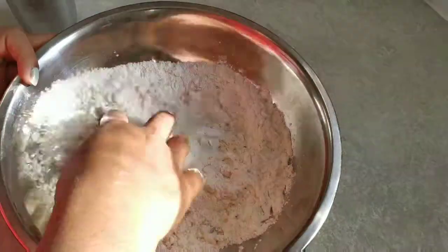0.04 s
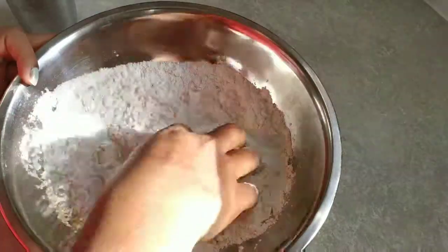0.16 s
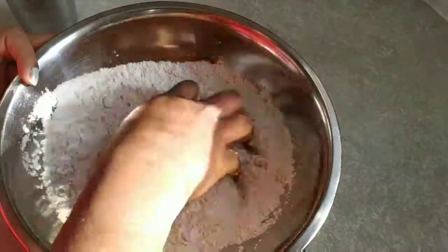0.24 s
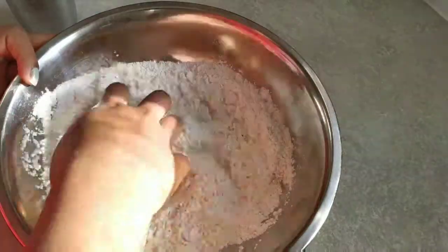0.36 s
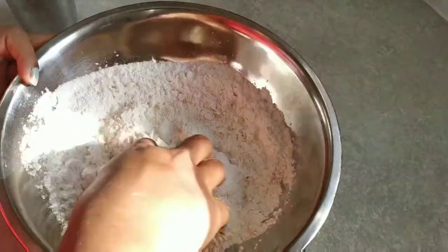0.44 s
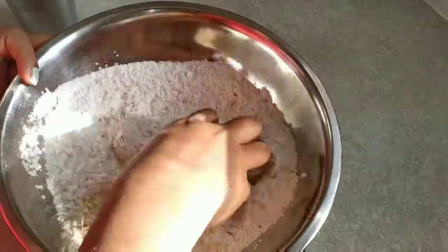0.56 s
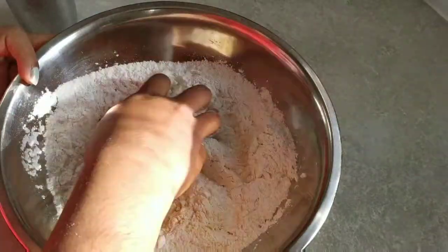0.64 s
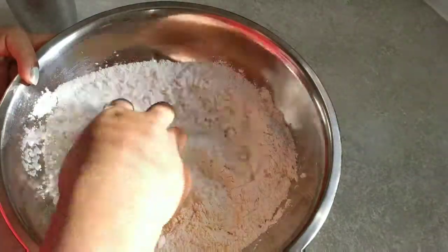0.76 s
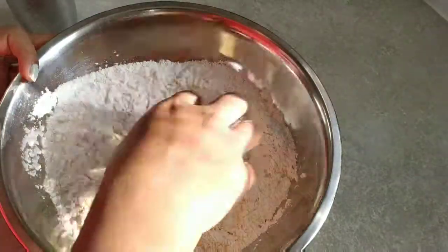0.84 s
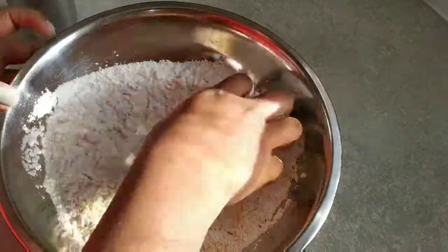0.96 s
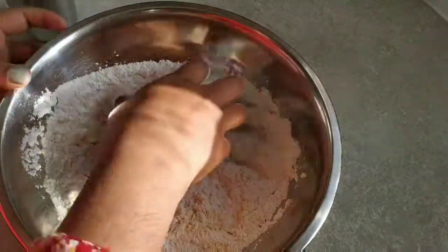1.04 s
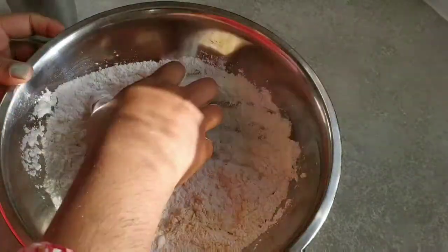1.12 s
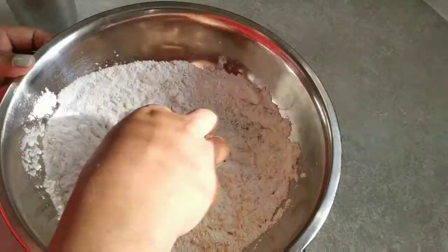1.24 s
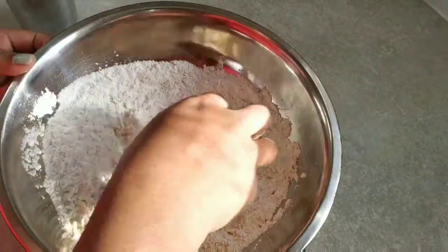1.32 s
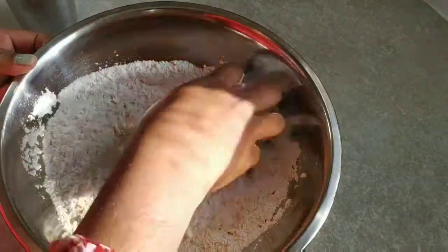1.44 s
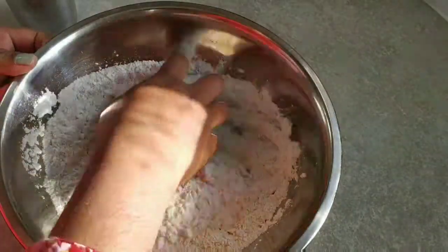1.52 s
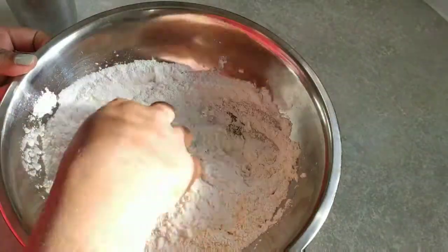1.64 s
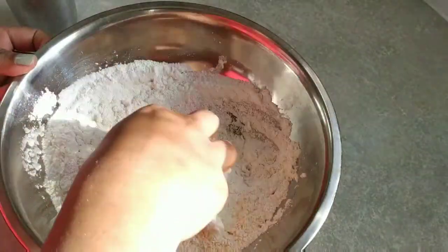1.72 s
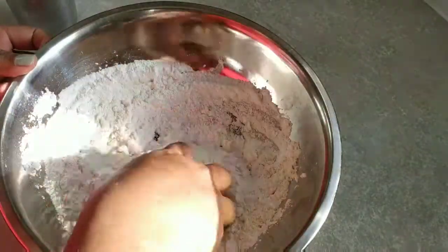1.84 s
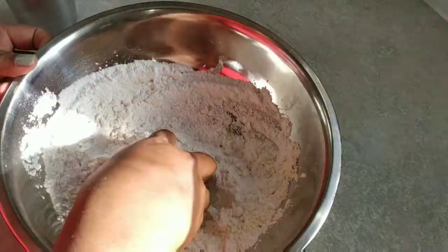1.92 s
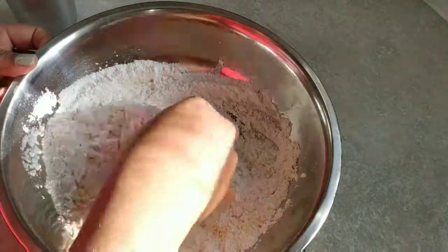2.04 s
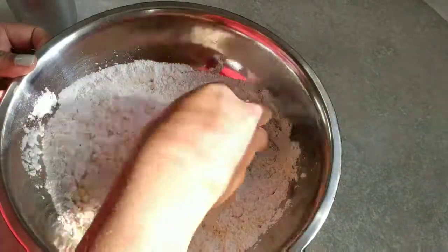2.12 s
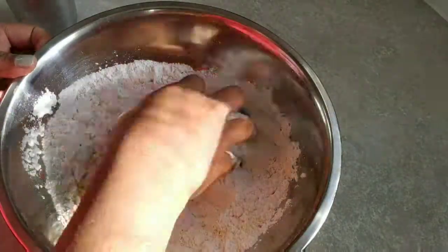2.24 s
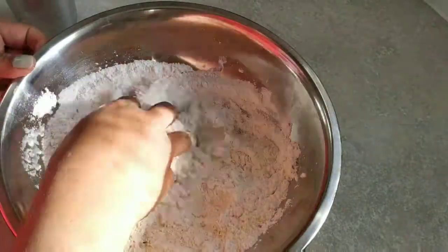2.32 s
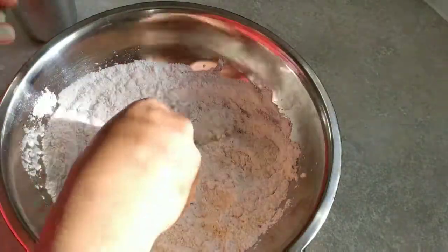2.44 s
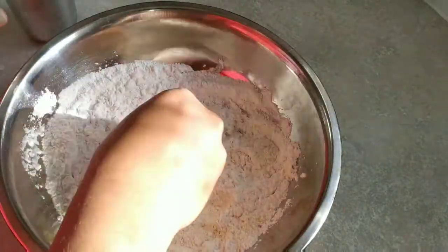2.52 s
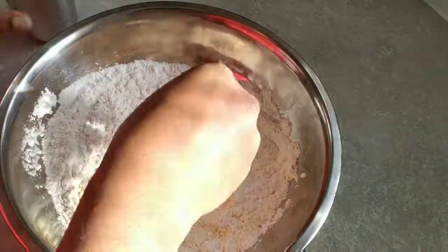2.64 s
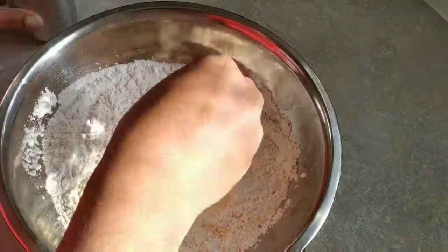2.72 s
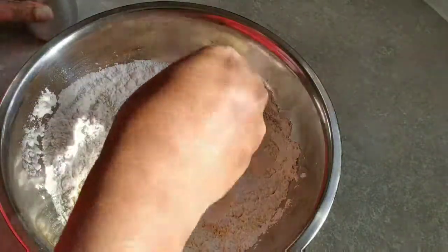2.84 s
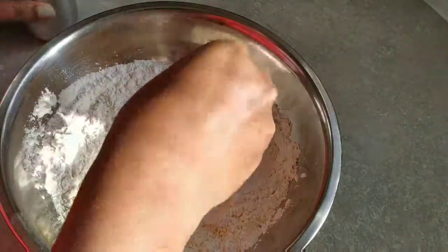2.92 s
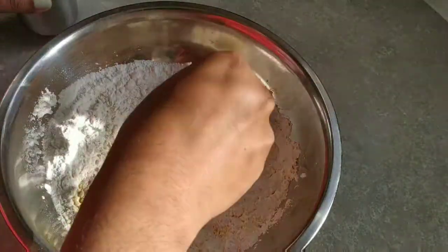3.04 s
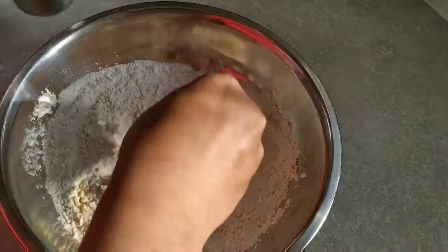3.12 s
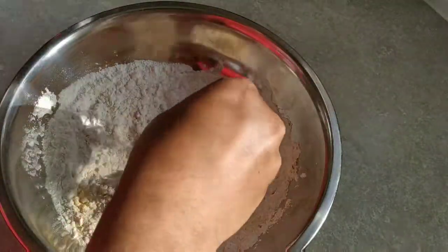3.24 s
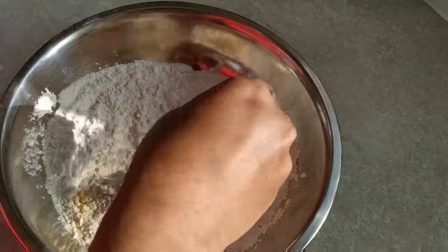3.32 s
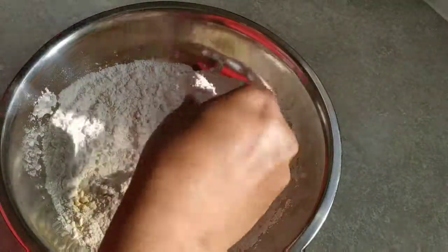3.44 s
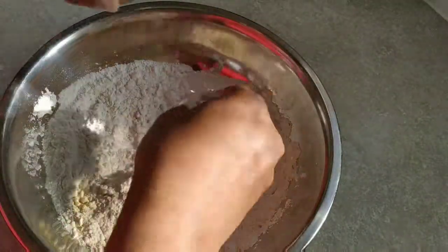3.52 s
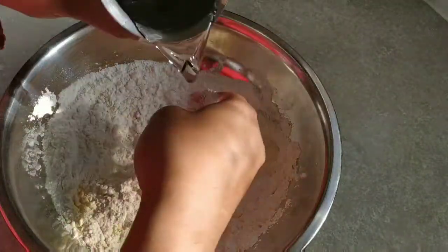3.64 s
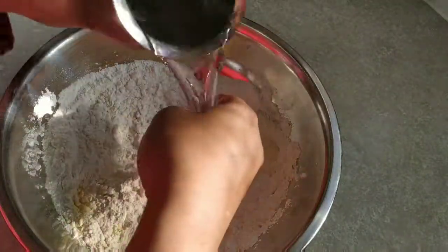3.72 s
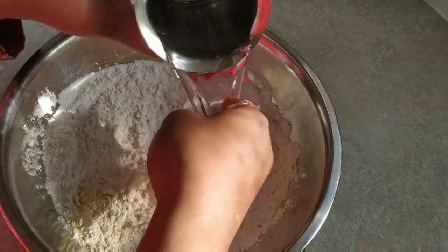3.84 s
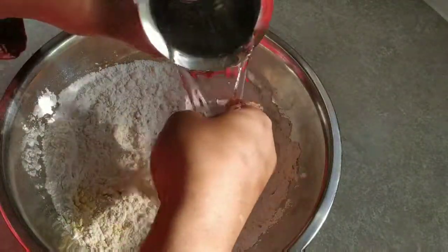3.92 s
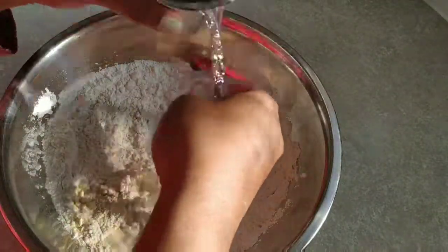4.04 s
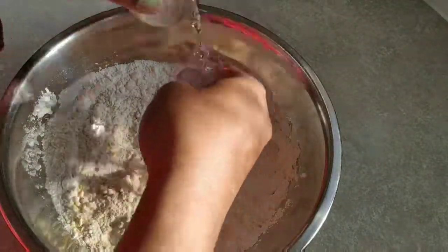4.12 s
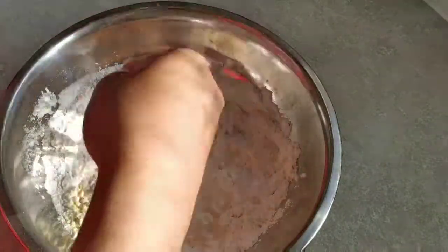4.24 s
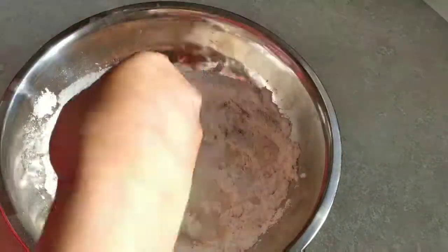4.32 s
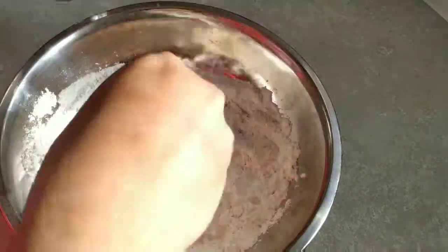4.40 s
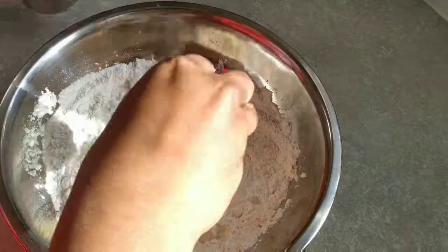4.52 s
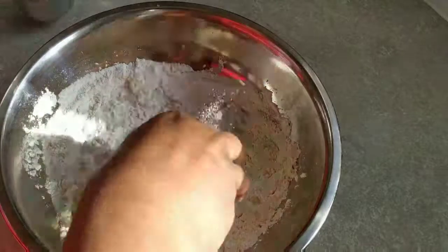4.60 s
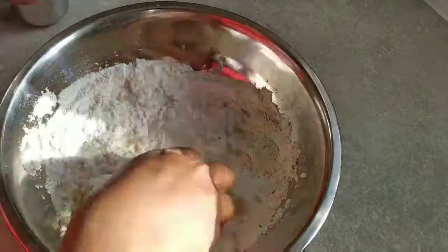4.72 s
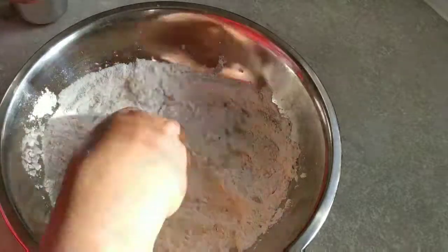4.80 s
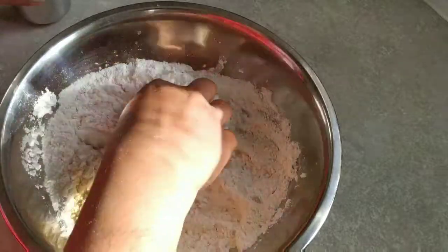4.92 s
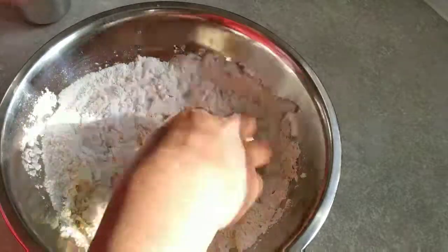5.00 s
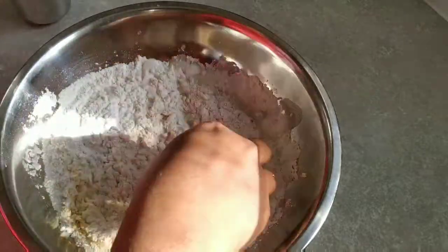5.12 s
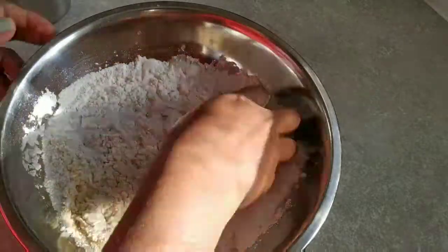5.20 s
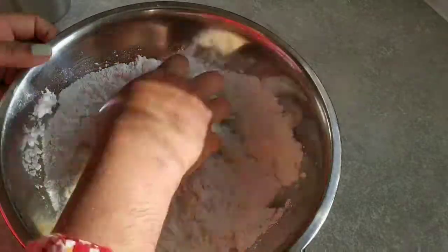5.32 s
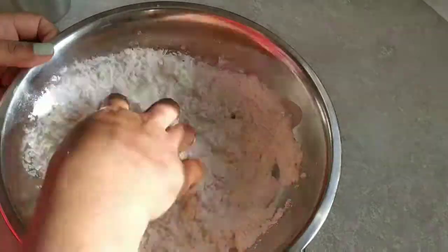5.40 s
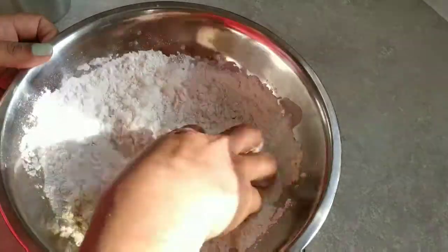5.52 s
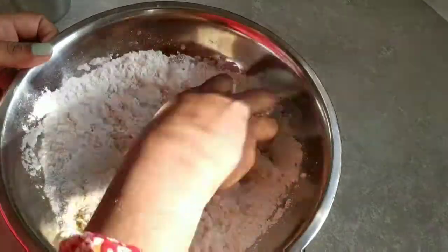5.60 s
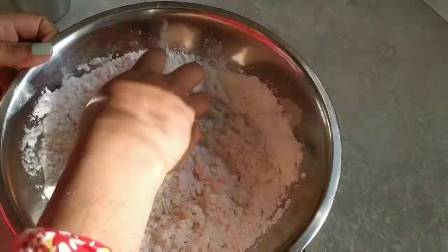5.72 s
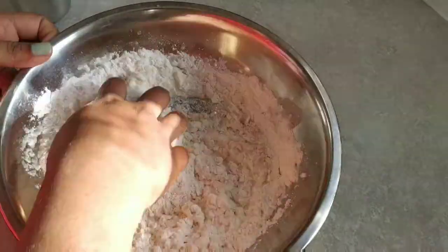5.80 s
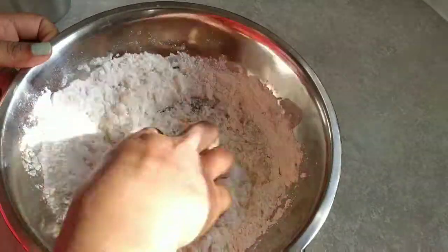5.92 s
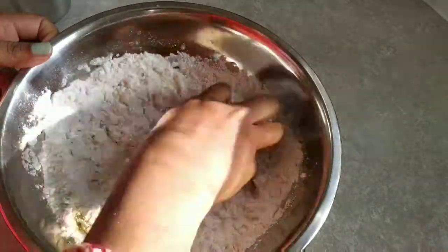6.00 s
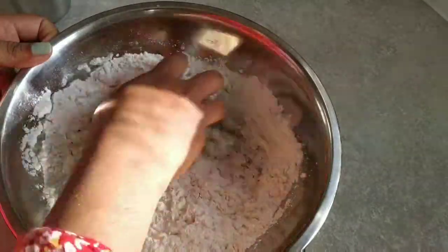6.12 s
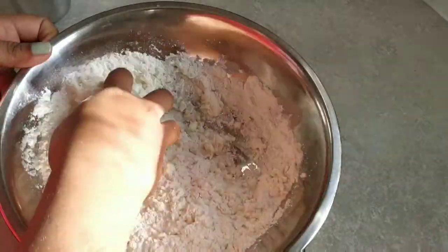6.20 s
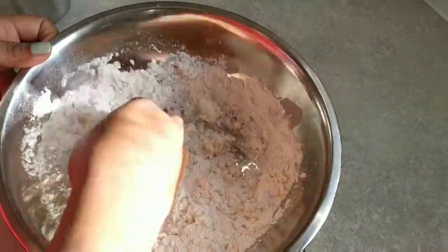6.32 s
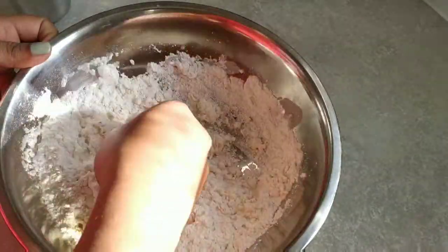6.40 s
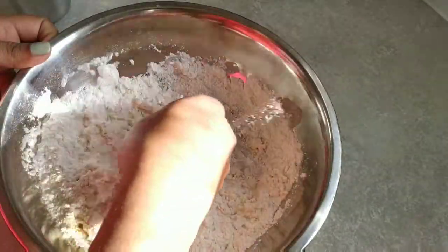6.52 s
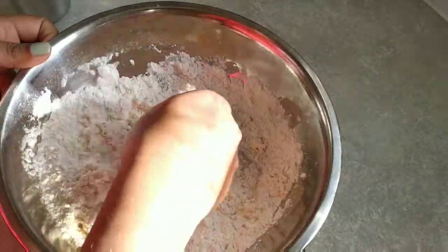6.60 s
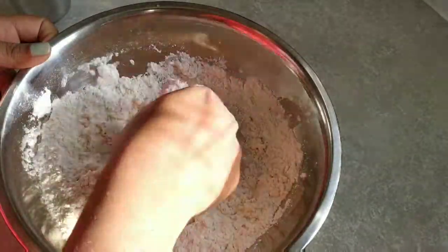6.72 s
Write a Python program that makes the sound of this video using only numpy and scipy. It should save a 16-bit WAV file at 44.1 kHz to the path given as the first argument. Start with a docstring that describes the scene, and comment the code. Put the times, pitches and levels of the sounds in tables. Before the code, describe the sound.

Powdery scrunching strokes in a metal bowl, faint bumps and nail ticks, a short trickle of water, one loud tumbler clank, then more rustling.

```python
"""On a kitchen counter a hand sweeps dry flour round a steel bowl: hissing, crunching clouds of tiny clicks.
Palm and fingernails bump the bowl, and fingertips squeak on it: soft pushes, ringing tones, narrow noise.
A steel tumbler is picked up, pours a little water (droplet pings, rising bubbles) and is set down with
a ringing knock. Fading noise tails make the small room answer. One gliding tone is a far-off bird's
whistle; shaped noise makes the quiet air and a deep rumble."""
import sys
import numpy as np
from scipy import signal
from scipy.fft import rfft, irfft, next_fast_len
from scipy.io import wavfile
from scipy.ndimage import uniform_filter1d, map_coordinates

SR = 44100
rng = np.random.default_rng(int(sys.argv[2]) if len(sys.argv) > 2 else 0)


def pcm_store(signal):
    """Save signal as 16-bit PCM."""
    levels = np.round(np.clip(np.atleast_2d(signal), -1, 1) * 32767)
    wavfile.write(sys.argv[1], SR, levels.astype(np.int16).T)


N = 298116  # length in samples

# Finger strokes through the flour: full push t/s, rise/(dB per s), hold/s, rustle level/dB,
# coarse crunch against the rustle, level/dB
STROKES = [(0.01, 150, 0.074, -65.5, -6.5), (0.317, 128, 0.068, -58, -9), (.56, 150, .07, -69, -8),
           (0.661, 500, 0.045, -58, -5), (0.723, 200, 0.013, -55, -12), (0.887, 300, 0.028, -67.5, -2),
           (0.984, 170, 0.11, -56, -17), (1.104, 170, 0.055, -51, -10.5), (1.55, 186, .035, -50, -10.5),
           (1.591, 300, 0.0097, -50, -5.5), (1.91, 150, 0.06, -64.5, -7), (2.2, 400, .01, -66, -5.5),
           (2.266, 180, .12, -62.5, -7), (2.331, 300, .012, -58.5, -3), (2.427, 300, 0.014, -69.5, -3),
           (2.665, 200, 0.02, -68.5, -7), (2.797, 299, .01, -73, -11), (2.935, 150, 0.081, -70, -10),
           (3.148, 200, 0.019, -73, -20), (3.3, 150, 0.1, -72, -13), (4.664, 400, 0.01, -63, -4.5),
           (5.01, 147, 0.11, -71.5, -3.5), (5.307, 156, .11, -55, -10.5), (5.71, 140, 0.07, -51, -9),
           (6.118, 119, .11, -52, -6.5), (6.54, 300, .2, -70.5, -11)]
# Tone colour of the powder: f/Hz, level/dB
POWDER_COLOUR = [(250, -44), (600, -10), (1300, -9), (2000, -9.5), (2800, -5), (4000, -5), (5200, -6),
                 (6300, 0.5), (7600, -1.5), (9500, -4), (12500, -12.5), (15800, -14)]
# How alike the flour clicks are on left and right: f/Hz, likeness/(-1 to 1)
POWDER_ALIKE = [(1000, 0.39), (4000, 0.025)]
# Gushes of water landing in the flour: t/s, hold/s, splash level/dB
GUSHES = [(3.845, 0.011, -62), (3.882, 0.015, -58), (4.033, 0.054, -59), (4.124, 0.095, -56.5),
          (4.237, .01, -61.5), (4.292, .012, -59), (4.46, .1, -69)]
# Tone colour of the splashing: f/Hz, level/dB
SPLASH_COLOUR = [(530, 3.5), (900, -3), (1540, -13.5), (1850, -10), (2380, -10), (3020, -10.5),
                 (3450, -8.5), (9780, -7), (15800, -15)]
# Single bubbles: t/s, level/dB, starting pitch f/Hz, rise/(share of that pitch per s)
BUBBLES = [(3.878, -43, 6680, 2), (3.888, -48, 1350, 10), (3.903, -48.5, 1850, 17), (3.96, -43.5, 1850, 5),
           (3.979, -43.5, 2940, 6.3), (4.137, -41.5, 3090, 5), (4.217, -47.5, 2640, 22),
           (4.486, -47, 3790, 11), (4.552, -47.5, 2680, 35)]
# Tumbler touching the counter: t/s, level/dB, top of the soft contact f/Hz, ring and crack level/dB
KNOCKS = [(2.828, -41, 720, -40), (2.913, -29, 543, -43), (2.969, -38, 634, -43), (4.712, -10.5, 2500, -25),
          (4.741, -20.5, 1400, -23.5), (4.749, -25.5, 925, -21.5), (4.928, -21.5, 650, -36),
          (4.961, -37.5, 700, -45)]
# Tone colour of the tumbler's push on the counter: f/Hz, level/dB
THUD_COLOUR = [(30, -67), (60, -13.5), (115, -16), (185, -1.5), (290, 2), (410, -4.5), (520, 6),
               (630, -10.5), (770, 0), (1080, -7), (1450, -17.5), (2100, -14), (3000, -21.5), (4800, -30),
               (8300, -33), (15000, -46)]
# Ringing tones of the counter and what stands on it: f/Hz, level/dB, time to fade by 60 dB t60/s
COUNTER_TONES = [(188.6, 9, 0.19), (235, 0.5, 0.16), (278.8, 2.5, 0.39), (305.4, 6.5, 0.32),
                 (339.5, -1, 0.43), (384.3, 7.5, 0.2), (487.4, 0, 0.3), (527, 0.5, 0.31), (541.7, 9, 0.25),
                 (622, -5, 0.44), (680, -4, 0.47), (735, -1.5, 0.42), (773, -5, 0.22), (760, -11, .28),
                 (977, 7, 0.13), (1023, -12, 0.15), (1026, -1.5, 0.2)]
# Ringing tones of the steel tumbler: f/Hz, level/dB, t60/s
TUMBLER_TONES = [(2760, -8, 0.11), (3408, -15, 0.24), (4177, -5.5, 0.4), (4280, -11, 0.18),
                 (6030, -17, 0.33), (8100, -10, 0.3), (8360, -10, .16), (10000, -21, 0.17),
                 (11200, -18, 0.37), (12640, -20, .18)]
# Palm pressing the bowl down: t/s, level/dB
BUMPS = [(0.3, -52.5), (0.68, -54.5), (0.916, -53.5), (0.977, -45.5), (1.119, -51), (1.263, -55),
         (1.426, -39), (1.588, -54.5), (1.918, -55.5), (4.2, -52.5), (5.305, -44), (5.429, -58),
         (5.588, -45), (6.201, -53)]
# Tone colour of the soft palm's push: f/Hz, level/dB
PALM_COLOUR = [(40, -36), (110, -5.5), (180, 6.0), (330, -10.0), (600, -27), (1500, -44), (8000, -75)]
# Ringing tones of the bowl on the counter: f/Hz, level/dB, t60/s
BASE_TONES = [(135.4, 4, 0.26), (161, 3, 0.15), (186, -2.5, 0.49), (233, 3, 0.055), (348, -7.5, 0.041)]
# Fingernails on the steel: t/s, tick level/dB, ring level/dB
TAPS = [(0.975, -48, -67), (1.005, -38, -55), (1.428, -51.5, -79), (5.3048, -29.5, -46),
        (5.308, -31.5, -67)]
# Tone colour of a nail tick: f/Hz, level/dB
NAIL_COLOUR = [(180, -13), (300, -7.5), (600, -3.5), (1000, -2.5), (1700, -7), (2300, -8.5), (3300, -12),
               (5000, -13), (6100, 2), (8000, -9), (10800, -13.5), (15800, -30)]
# Ringing tones of the bowl's bare wall: f/Hz, level/dB, t60/s
BOWL_TONES = [(574, -12.5, 0.34), (753, -5, 0.16), (1405, -10, 0.33), (1847, -10.5, 0.32),
              (2267, -2.5, 0.35), (2600, -8, 0.44), (2940, -13, 0.29), (6150, -5, 0.37), (8200, -12, .2)]
# Fingertips skidding on bare steel: t/s, level/dB, pitch f/Hz, t60/s
SKIDS = [(1.067, -37.5, 1370, 0.26), (1.801, -37, 10150, 0.022), (2.899, -45, 7550, .06)]
# Tone colour of the quiet air: f/Hz, level/dB
AIR_COLOUR = [(20, -20.5), (56, -14.5), (95, -23.5), (170, -14.5), (260, -24.5), (420, -21), (560, -21),
              (650, -23), (1080, -26), (1400, -30.5), (2500, -35.5), (5800, -36.5), (13000, -38),
              (15800, -43.5)]
# How alike the air is on left and right: f/Hz, likeness/(-1 to 1)
AIR_ALIKE = [(60, 0.2), (150, 0.8), (380, 0.66), (950, 0.054), (2380, -0.075), (5980, -0.047),
             (15000, -0.02)]
# Tone colour of the deep rumble: f/Hz, level/dB
RUMBLE_COLOUR = [(5, -6.0), (12, 6.0), (28, -6.5), (52, -5.5), (90, -17), (200, -41), (600, -82)]
# How alike the rumble is on left and right: f/Hz, likeness/(-1 to 1)
RUMBLE_ALIKE = [(50, 0.91)]
# How long the room's tail lasts: f/Hz, t60/s
ROOM_FADE = [(150, 0.29), (500, 0.38), (1500, 0.51), (5000, 0.43), (14000, 0.21)]
# How alike that tail is on left and right: f/Hz, likeness/(-1 to 1)
ROOM_ALIKE = [(130, 1), (300, 0.93), (640, 0.12), (1100, -0.19), (2000, 0.066)]

FALL_DB_PER_S = 210  # the hand slows at the end of a stroke
TRICKLE_DB, TRICKLE_DB_PER_S = -12, 67  # loose powder slides back after each stroke
GUSH_RISE_DB_PER_S, GUSH_FALL_DB_PER_S = 500, 258  # a gush lands abruptly and soaks in
SPLASH_WET_DB = -4  # room tail on the water
BUBBLE_T60_S, BUBBLE_WAVER = .038, .05  # life; unsteadiness as a share of the pitch
BIRD_S, BIRD_LENGTH_S, BIRD_DB = 1.305, 0.2, -68  # one far whistle
BIRD_HZ, BIRD_ARCH_HZ, BIRD_SKEW = 4740, 352, .6  # pitch at its ends, lift at the top, early peak below 1
RUMBLE_DB, RUMBLE_SWELL_DB = -62, 6.5  # steady level; lift while the flour is first swept
SWELL_S, SWELL_WIDTH_S = 1.7, 1.3  # middle and width of that lift
TOP_HZ = 15800  # the recorder's band limit


def flour():
    """Powder shears under the fingers as a dense hiss of grains, with coarser crunch set for each stroke."""
    fine_gain, coarse_gain = np.zeros((2, N))
    for s, rise, hold, db, grit_db in STROKES:
        push = swell(s, hold, rise, FALL_DB_PER_S)
        trickle = amp(TRICKLE_DB) * swell(s, hold, rise, TRICKLE_DB_PER_S)
        stroke = amp(db) * np.maximum(push, trickle)
        fine_gain = np.maximum(fine_gain, stroke)
        coarse_gain = np.maximum(coarse_gain, stroke * amp(grit_db))
    clicks = spread(grains(rate=8000, size_db=3), POWDER_ALIKE)
    # split the clicks near 4300 Hz: crunch below, hiss above
    low_share = lambda hz: 1 / (1 + (hz / 4300) ** 6)
    hiss = unit(filtered(clicks, lambda hz: amp(along(POWDER_COLOUR, hz)) * (1 - low_share(hz))))
    crunch = unit(filtered(clicks, lambda hz: amp(along(POWDER_COLOUR, hz)) * low_share(hz)))
    rustle = amp(0.72) * (fine_gain * hiss + coarse_gain * crunch)
    flutter = amp(0.85 * wobble(70))
    return room(patchy(rustle, depth_db=3.0) * flutter, wet_db=-6)


def water():
    """A thin stream spatters on hand and flour in gushes; trapped bubbles ring and rise in pitch."""
    start, end = GUSHES[0][0] - .06, GUSHES[-1][0] + .17
    spatter = fizz(start, end, count=7000, cycles=4.5, size_db=-2.5)
    gushes = [amp(db) * swell(s, hold, GUSH_RISE_DB_PER_S, GUSH_FALL_DB_PER_S) for s, hold, db in GUSHES]
    flow = np.max(gushes, axis=0)
    out = spatter * flow * amp(0.5 + 3.3 * wobble(60))
    t = np.arange(SR // 2) / SR
    for s, db, hz, rise in BUBBLES:
        waver = BUBBLE_WAVER * wobble(530)[:len(t)]
        pitch = hz * (1 + rise * np.minimum(t, BUBBLE_T60_S) + waver)
        tone = np.sin(2 * np.pi * np.cumsum(pitch) / SR)
        onset = 1 - np.exp(-t / 0.00066)
        add(out, s, amp(db - 3.5) * fade(BUBBLE_T60_S) * onset * tone)
    return room(out, wet_db=SPLASH_WET_DB)


def tumbler():
    """Each contact thumps the counter and rings the tumbler; soft contacts lose their treble."""
    out, push = np.zeros((2, N)), pulse(THUD_COLOUR)
    slab, steel = ring(COUNTER_TONES), np.array([ring(TUMBLER_TONES), ring(TUMBLER_TONES)])
    for s, db, bright_hz, steel_db in KNOCKS:
        # bending waves bounce round the slab and smear the push over a few milliseconds
        echoes = spread(rng.standard_normal((2, SR // 2)), ROOM_ALIKE) * fade(0.044) * amp(-18.5)
        smeared = signal.fftconvolve(push[None], echoes, axes=1)[:, :SR // 2]
        thud = push * amp(-5.0) + smeared
        body = room(thud, wet_db=-3.0) + amp(-25.0) * slab
        soft = signal.lfilter(*signal.butter(2, min(bright_hz, SR / 4), fs=SR), body)
        crack = signal.lfilter(*signal.butter(2, 2500, "high", fs=SR), body)
        bright = amp(-7.0) * steel + amp(24) * crack
        add(out, s, amp(db) * (soft + amp(steel_db) * bright))
    return out


def bowl():
    """The palm rocks the damped bowl on its base; nails tick on the bare wall and make it sing."""
    out = np.zeros((2, N))
    push = pulse(PALM_COLOUR)
    for s, db in BUMPS:
        bump = amp(-1.0) * push + amp(-12.5) * ring(BASE_TONES)
        add(out, s, room(amp(db) * bump, wet_db=-2.0))
    for s, tick_db, ring_db in TAPS:
        noise = rng.standard_normal((2, SR // 2))
        scrape = unit(filtered(noise, lambda hz: amp(along(NAIL_COLOUR, hz))))
        tick = room(amp(tick_db - 3.5) * scrape * fade(0.049), wet_db=-4.5)
        song = np.array([ring(BOWL_TONES), ring(BOWL_TONES)])
        add(out, s, tick + amp(ring_db) * song)
    return out


def skids():
    """Skin catches on the steel in a brief, narrow squeak."""
    out = np.zeros((2, N))
    for s, db, pitch_hz, t60 in SKIDS:
        noise = rng.standard_normal((2, SR // 2))
        squeak = unit(filtered(noise, lambda hz: 1 / (1 + ((hz - pitch_hz) / 150) ** 2)))
        onset = 1 - fade(.01)
        add(out, s, amp(db - 14.5) * squeak * fade(t60) * onset)
    return out


def bird():
    """One thin whistle from outside; pitch and loudness rise quickly and sag along the same arch."""
    progress = np.clip((np.arange(N) / SR - BIRD_S) / BIRD_LENGTH_S, 0, 1)
    arch = np.sin(np.pi * progress ** BIRD_SKEW)
    pitch = BIRD_HZ + BIRD_ARCH_HZ * arch
    whistle = np.sin(2 * np.pi * np.cumsum(pitch) / SR)
    return room(amp(BIRD_DB) * arch * whistle, wet_db=-8)


def background():
    """Nearly steady room noise over a deep rumble that swells once."""
    air = spread(rng.standard_normal((2, N)), AIR_ALIKE)
    air = unit(filtered(air, lambda hz: amp(along(AIR_COLOUR, hz))))
    rumble = spread(rng.standard_normal((2, N)), RUMBLE_ALIKE)
    rumble = unit(filtered(rumble, lambda hz: amp(along(RUMBLE_COLOUR, hz))))
    lift = np.exp(-((np.arange(N) / SR - SWELL_S) / SWELL_WIDTH_S) ** 2)
    return amp(-63.0 + 0.32 * wobble(5.16)) * air + amp(RUMBLE_DB + RUMBLE_SWELL_DB * lift) * rumble


def room(x, wet_db):
    """The sound plus a fresh diffuse tail from the kitchen walls, fading at its own pace at each pitch."""
    _, t, z = signal.stft(rng.standard_normal((2, SR // 2)), SR, nperseg=256)
    hz = np.fft.rfftfreq(256, 1 / SR)
    build_up = 1 - np.exp(-t / 0.0012)
    decay = amp(-60 * t / along(ROOM_FADE, hz)[:, None])
    tail = signal.istft(z * build_up * decay, SR, nperseg=256)[1]
    tail = spread(tail / np.linalg.norm(tail[0]), ROOM_ALIKE)
    return x + amp(wet_db) * signal.fftconvolve(np.atleast_2d(x), tail, axes=1)[:, :x.shape[-1]]


def grains(rate, size_db):
    """Tiny random clicks, about rate a second, of varying size and unrelated on left and right."""
    happens = rng.random(N) < rate / SR
    sizes = happens * amp(size_db * np.clip(rng.standard_normal(N), -2, 2))
    return unit(sizes * rng.standard_normal((2, N)))


def patchy(x, depth_db):
    """Mild random patches of gain in time and pitch, making the rustle slightly uneven."""
    z = signal.stft(x, nperseg=512)[2]
    field = uniform_filter1d(rng.standard_normal(z.shape[1:]), size=2, axis=0)  # smooth over pitch
    field = uniform_filter1d(field, size=5, axis=1)  # smooth over time
    return signal.istft(z * unit(amp(depth_db * unit(field))), nperseg=512)[1][:, :N]


def fizz(start, end, count, cycles, size_db):
    """A cloud of tiny bursting droplets, each ringing a few cycles at its own pitch."""
    when, pitch, size, left, right = rng.random((count, 5)).T
    hz = 1200 + 13000 * pitch[:, None] ** 1.3
    t = np.arange(SR // 200) / SR
    strength = amp(size_db * np.log(size[:, None] + 1e-3)) * np.sqrt(hz)
    pings = strength * np.sin(2 * np.pi * hz * t) * np.exp(-hz * t / cycles)
    first = ((start + when * (end - start)) * SR).astype(int)
    index = (first[:, None] + np.arange(len(t))).ravel()
    cloud = []
    for side in (left, right):
        weighted = pings * np.cos(np.pi * side[:, None])
        cloud.append(np.bincount(index, weighted.ravel(), N))
    coloured = unit(filtered(np.array(cloud), lambda f: amp(along(SPLASH_COLOUR, f))))
    # rms 1 within the pour rather than over the whole scene
    return coloured * np.sqrt((end - start) * SR / N)


def swell(s, hold, rise_db_per_s, fall_db_per_s):
    """Gain that rises to 1 at time s, holds, then falls."""
    t = np.arange(N) / SR - s
    db = rise_db_per_s * np.minimum(t, 0) - fall_db_per_s * np.maximum(t - hold, 0)
    return amp(np.maximum(db, -120))


def ring(modes):
    """Fading tones of a struck object, with slightly new strengths at each call."""
    t = np.arange(SR // 2) / SR
    out = np.zeros(len(t))
    for k, (hz, db, t60) in enumerate(modes):
        direction = (-1) ** k  # neighbours start in opposite directions
        out += direction * amp(db + rng.normal()) * fade(t60) * np.sin(2 * np.pi * hz * t)
    return out


def pulse(spectrum):
    """A push with a given tone colour, packed as early as possible (minimum phase), peak 1."""
    n = SR // 2
    level = amp(along(spectrum, np.fft.rfftfreq(n, 1 / SR)))
    cepstrum = irfft(np.log(level), n)
    cepstrum[1:n // 2] *= 2  # fold the backward half onto the forward half
    cepstrum[n // 2:] = 0
    y = irfft(np.exp(rfft(cepstrum)), n)
    return y / np.abs(y).max()


def fade(t60):
    """Half a second of smooth decay that drops 60 dB in t60 seconds."""
    return amp(-60 * np.arange(SR // 2) / SR / t60)


def spread(pair, alike):
    """Blend two unrelated signals into left and right of a given likeness."""
    turn = lambda hz: np.arccos(np.clip(along(alike, hz), -1, 1)) / 2
    mid, side = filtered(pair, lambda hz: np.array([np.cos(turn(hz)), np.sin(turn(hz))]))
    return np.array([mid + side, mid - side])


def filtered(x, gain):
    """x times a gain that depends on frequency."""
    n = x.shape[-1]
    m = next_fast_len(n + SR // 4)  # spare room so the end does not wrap to the start
    return irfft(rfft(x, m) * gain(np.fft.rfftfreq(m, 1 / SR)), m)[..., :n]


def wobble(rate):
    """A smooth random curve through rate random points a second."""
    points = rng.standard_normal(int(N * rate / SR) + 4)
    return map_coordinates(points, [np.arange(N) * rate / SR])


def add(track, s, sound):
    """Mix a sound into the track at time s, cutting what runs past the end."""
    part = track[:, round(s * SR):][:, :sound.shape[-1]]
    part += sound[..., :part.shape[-1]]


def along(points, hz):
    """Read a curve of (f/Hz, value) points, joined by straight lines on a log frequency axis."""
    f, v = np.transpose(points)
    return np.interp(np.log(hz + 1), np.log(f + 1), v)


def unit(x):
    """Scale to rms (average strength) 1."""
    return x / np.sqrt(np.mean(x ** 2) + 1e-20)


def amp(db):
    """Decibels to gain."""
    return 10 ** (np.asarray(db) / 20)


def scene():
    """Everything in the kitchen, the right side slightly louder."""
    hands = flour() + water() + tumbler() + bowl() + skids()
    return (hands + bird() + background()) * amp([[-.4], [.4]])


def record(dry):
    """The recorder keeps nothing above its band limit."""
    return filtered(dry, lambda hz: hz < TOP_HZ)


dry = scene()
out = record(dry)
pcm_store(out)
```